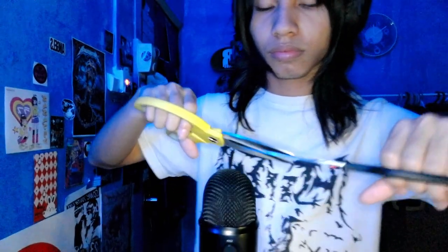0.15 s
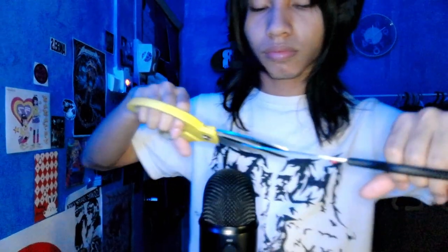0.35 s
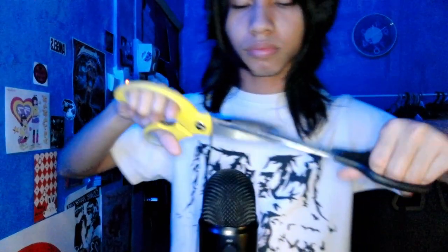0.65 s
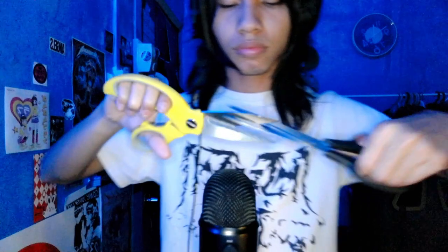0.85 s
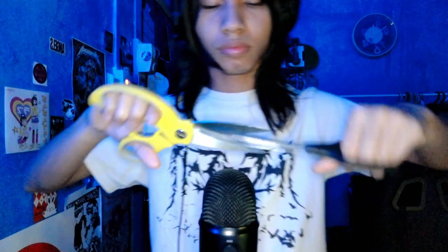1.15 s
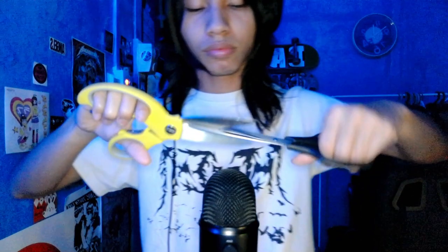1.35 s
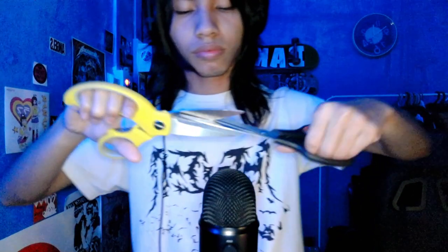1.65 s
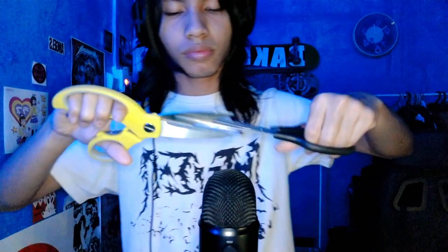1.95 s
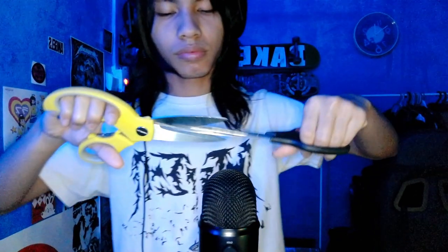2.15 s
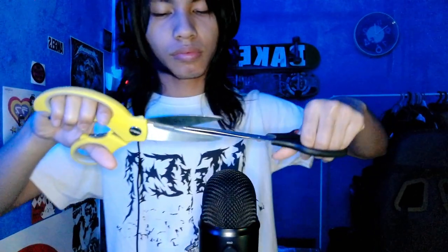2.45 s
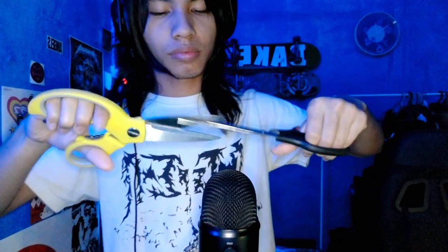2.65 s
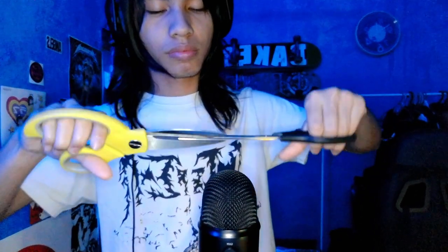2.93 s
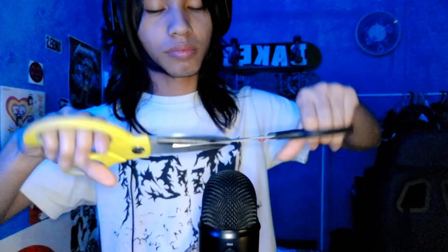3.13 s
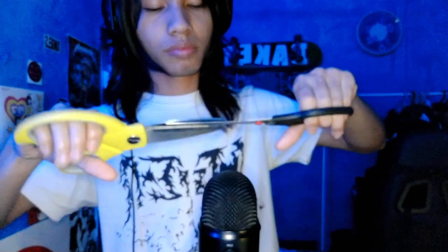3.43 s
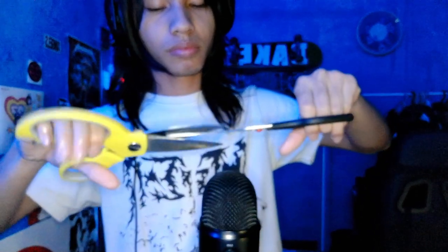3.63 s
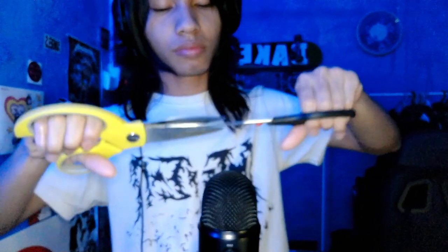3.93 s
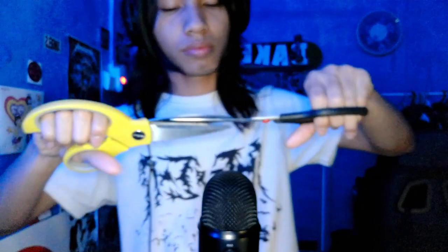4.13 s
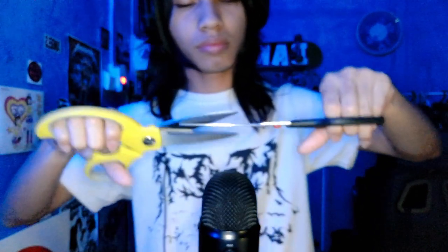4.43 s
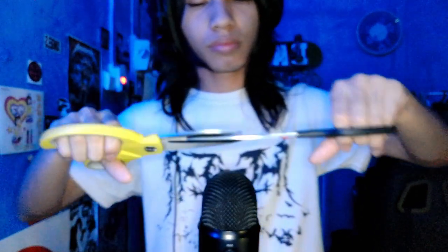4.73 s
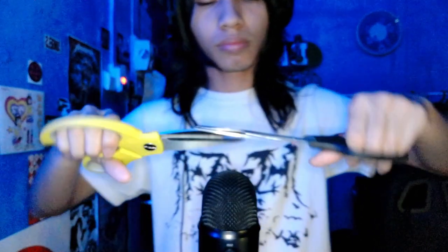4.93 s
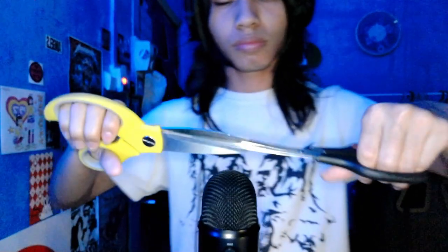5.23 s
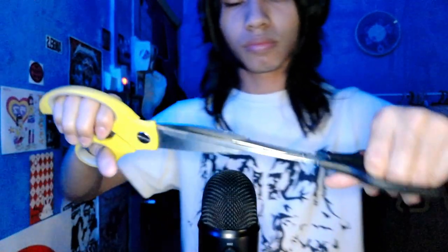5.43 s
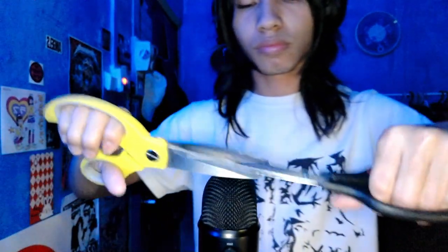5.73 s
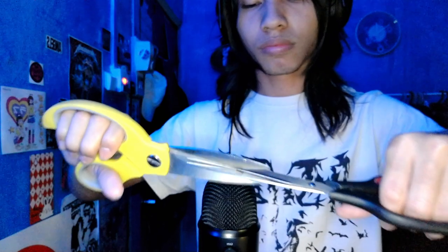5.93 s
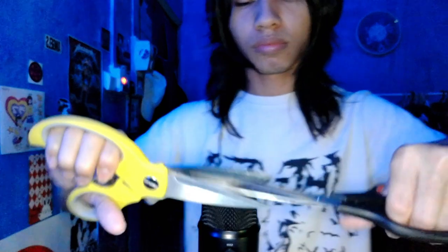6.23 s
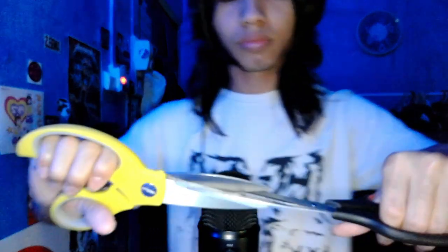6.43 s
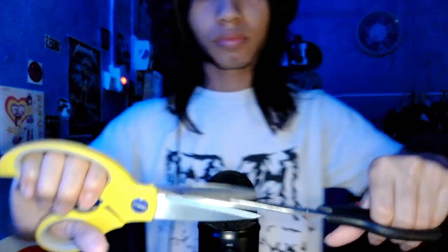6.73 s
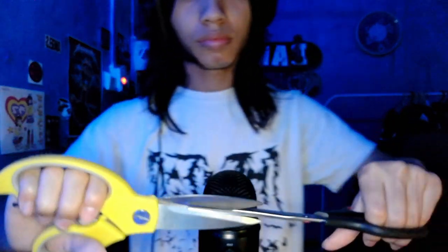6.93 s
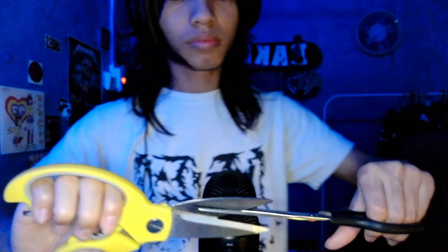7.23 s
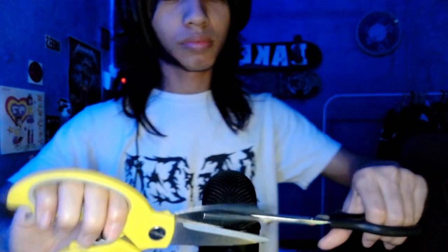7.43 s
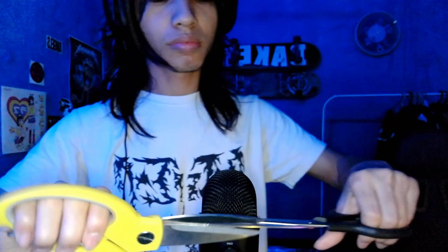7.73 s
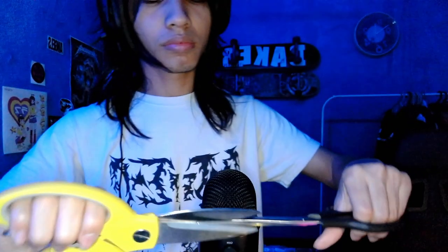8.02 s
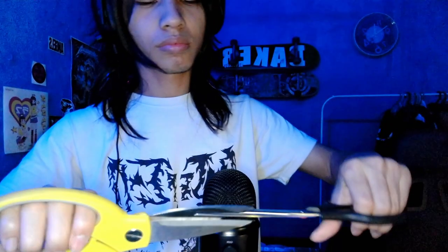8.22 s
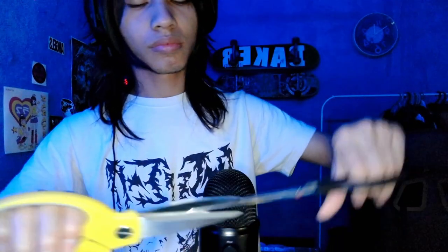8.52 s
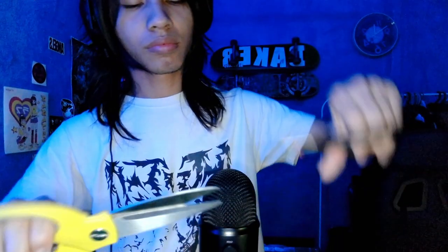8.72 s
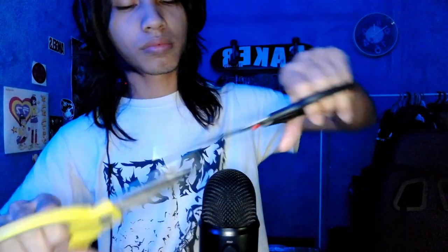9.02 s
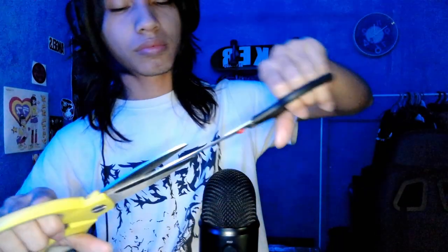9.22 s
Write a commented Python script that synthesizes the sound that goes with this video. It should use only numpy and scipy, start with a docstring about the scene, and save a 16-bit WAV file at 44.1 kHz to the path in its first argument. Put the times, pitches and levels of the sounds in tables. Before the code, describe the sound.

Steel scissor blades slide and clash irregularly up close, ringing sharply around two seconds, then lighter scrapes and hard snips near the end.

```python
"""Two large pairs of scissors are worked against each other close to a stereo microphone in a small room.
From the start steel edges slide with a gritty stick-slip rasp and tick as they meet; the loudest come near 2 s.
Each stroke or blow rings the blades, knocks in the plastic handles and jolts the hands. From 4.2 to 6.9 s the
hands move round to the front; hard snips return near 9 s. Short echo and low rumble throughout."""
import sys
import numpy as np
from scipy import signal
from scipy.fft import rfft, irfft
from scipy.io import wavfile

SR = 44100
rng = np.random.default_rng(int(sys.argv[2]) if len(sys.argv) > 2 else 0)


def log_audio(samples):
    """Write samples as a 16-bit WAV file to the path given in sys.argv[1]."""
    # one column per channel
    frames = np.atleast_2d(samples).T
    # limit to full scale, then quantise
    limited = np.clip(frames, -1, 1)
    pcm = np.round(limited * 32767).astype(np.int16)
    wavfile.write(sys.argv[1], SR, pcm)


N = 413216
SIZE = 12288  # samples per event
T = np.arange(SIZE) / SR
HZ = np.arange(SIZE // 2 + 1) * SR / SIZE

# slides of steel on steel: (start [s], swell [s], hold [s], fade [s], blade level [dB],
# tilt [dB/octave above 1200 Hz], handle level [dB])
STROKES = [(0.028, 0.019, .008, 0.042, -34.5, 2.5, -52), (0.069, 0.029, .045, .045, -36.5, 3, -56),
           (.275, 0.023, .008, .025, -51.5, 0, -58), (.333, 0.0093, .06, 0.09, -51.5, 0, -58),
           (0.493, 0.033, .11, 0.035, -47, -0.6, -59), (.70, 0.048, .11, 0.026, -47, -3.5, -59),
           (0.859, 0.016, .04, 0.023, -39, -2.5, -45.5), (0.995, 0.02, 0.0052, .008, -39.5, -1, -51),
           (1.028, 0.0042, .022, 0.044, -33.5, -2.1, -31.5), (1.238, 0.027, 0.0088, .006, -38.5, -1.5, -46),
           (1.282, 0.0082, 0.085, .015, -43, -1, -38.5), (1.608, 0.027, 0.0081, 0.027, -38, -0.5, -41.5),
           (1.66, 0.0036, 0.017, 0.11, -53, -1, -52), (1.757, 0.0053, .07, 0.016, -28, 1, -36),
           (1.949, 0.02, .04, 0.028, -33, 1, -47.5), (2.087, 0.026, 0.03, 0.066, -22, 2, -34),
           (2.249, 0.026, .05, 0.034, -36, 1.5, -56), (2.426, .024, 0.033, 0.08, -19, 3.5, -36.5),
           (2.84, 0.016, .01, 0.076, -44, -2, -42.5), (2.93, 0.029, .03, .06, -43, -2.5, -43),
           (3.17, .012, 0.0055, 0.018, -36.5, -0.5, -42.5), (3.215, 0.0083, 0.052, 0.057, -46.5, -1, -55.5),
           (3.382, 0.019, .015, .012, -40, -1.2, -56), (3.431, 0.011, .07, .01, -50.5, -1.5, -52.5),
           (3.571, 0.0068, .06, 0.037, -51.5, 1.5, -58), (3.768, 0.0063, .003, 0.013, -33.5, 1.5, -44.5),
           (3.952, 0.033, .01, 0.046, -42, -1.5, -49.5), (4.093, .015, 0.057, 0.065, -43, -2, -56),
           (4.26, 0.027, .015, 0.023, -57.5, -2.5, -52.5), (4.325, .015, 0.076, .02, -49, 2, -57),
           (4.407, 0.037, .015, 0.036, -38, -1.6, -49.5), (4.495, 0.033, .03, 0.02, -49.5, -3, -54.5),
           (4.588, 0.027, .03, 0.15, -47, -2, -52.5), (4.70, 0.062, 0.044, .05, -37, 0, -53.5),
           (4.88, .012, .008, 0.018, -28.5, 0.5, -38), (5.05, 0.0081, .015, 0.03, -52, -3.5, -46),
           (5.149, 0.014, 0.0093, 0.031, -34.5, -2.5, -38), (5.428, .015, 0.061, 0.032, -44.5, -1.5, -54),
           (5.52, 0.011, 0.068, .01, -52.5, -1.5, -59.5), (5.595, .02, .012, 0.045, -36.5, 0.5, -36.5),
           (5.71, 0.012, 0.027, 0.027, -49, 0, -49), (5.774, 0.023, 0.0052, 0.01, -49, -0.5, -42),
           (5.848, 0.014, .005, 0.078, -44.5, -3, -42.5), (5.944, 0.021, .04, 0.048, -40.5, -1, -50),
           (6.201, .012, .012, 0.034, -38, -0.5, -39.5), (6.351, 0.0075, .06, 0.034, -46.5, 1, -43.5),
           (6.44, 0.039, .04, 0.056, -39, -1.5, -47.5), (6.615, 0.0055, .005, 0.077, -55, -5.5, -50),
           (7.054, .015, .012, 0.056, -45.5, -2.5, -48), (7.293, .07, .02, 0.026, -42, -0.5, -47),
           (7.408, .018, .01, 0.038, -36.5, -3.5, -41.5), (7.466, 0.016, .15, 0.083, -50.5, -3, -49.5),
           (7.728, 0.011, .05, 0.11, -43, -2, -52), (7.979, 0.054, .04, 0.11, -51, -1.5, -54.5),
           (8.36, 0.053, .055, 0.043, -43, -0.9, -49.5), (9.151, 0.02, .012, 0.084, -37.5, 1, -52.5),
           (9.341, 0.013, .012, .02, -33, 4.5, -56)]
# broad response of the plastic handles: (frequency [Hz], level [dB])
HANDLE_RESPONSE = [(25, -13.5), (65, 11.5), (110, 4.5), (180, 1), (300, -1), (480, -5), (700, -7.5),
                   (1200, -14), (2500, -27), (8000, -57)]


def undb(db):
    """Decibels to gain."""
    return 10 ** (np.asarray(db) / 20)


def unit(x):
    """Scale to a mean energy of one per channel."""
    return x / np.sqrt(np.sum(x ** 2) / len(np.atleast_2d(x)) + 1e-18)


def contour(points, hz):
    """Decibels of a spectrum, joined on a log-frequency axis."""
    f, db = np.transpose(points)
    return np.interp(np.log(hz + 1), np.log(f), db)


def causal(db):
    """Minimum-phase response with the given gains: it rings only after the blow."""
    cepstrum = irfft(np.log(undb(db)))
    cepstrum[1:SIZE // 2] *= 2
    cepstrum[SIZE // 2 + 1:] = 0
    return np.exp(rfft(cepstrum))


def add(out, start_s, sound, pan_db):
    """Mix a sound in at its time, panned at constant energy."""
    i = max(int(start_s * SR), 0)
    gains = np.sqrt(2) * unit(undb(np.array([pan_db, -pan_db]) / 2))
    out[:, i:i + SIZE] += (gains[:, None] * sound)[:, :N - i]


def room_tone(level_db=-56, side_db=-3, unrelated_hz=900):
    """A steady low rumble, like a distant fan, under faint hiss that is unrelated left and right."""
    # spectrum of the rumble and hiss: (frequency [Hz], level [dB])
    tone_spectrum = [(25, 1.5), (50, -3), (110, -3), (200, -13), (420, -6.5), (550, -19), (750, -19),
                     (980, -20), (1500, -25), (3000, -33.5), (7000, -40), (15000, -39.5)]
    hz = np.arange(N // 2 + 1) * SR / N
    mid, side = rfft(rng.standard_normal((2, N))) * undb(contour(tone_spectrum, hz))
    # left and right share more of the lows
    side = irfft(side * undb(side_db / (1 + hz / unrelated_hz)), N)
    mid = irfft(mid, N)
    return undb(level_db) * (mid + np.array([side, -side])) / mid.std()


def room(dry, early_db=-19, late_db=-21, t60_s=0.41, dull_hz=7000):
    """Chest and desk reflect at once; the walls follow, longer and duller."""
    early = unit(rng.standard_normal((2, SIZE)) * np.exp(-T / .018) * (T > .003))
    late = unit(rng.standard_normal((2, SIZE)) * np.exp(-np.log(1000) * T / t60_s) * (T > .008))
    late = signal.sosfilt(signal.butter(1, dull_hz, fs=SR, output="sos"), late)
    echo = undb(early_db) * early + undb(late_db) * late
    return signal.fftconvolve(dry, echo, axes=1)[:, :N]


def place(time_s):
    """Pan, free-length resonance and its lift where the blades cross at this moment."""
    # crossing point: (time [s], left minus right [dB], resonance of the free blade length [Hz], its lift [dB])
    crossings = [(0, -1, 2160, 5), (.8, 1, 1830, 3), (1.05, 2, 1250, 3), (2.5, 3.5, 1250, 5),
                 (2.9, 2.5, 1400, 2.5), (4.3, 3.5, 1510, 1), (4.8, 2.5, 4270, -1.5), (6.3, 1, 4150, 2),
                 (8.1, -1.5, 4300, 2), (9.37, 4.5, 5120, 4)]
    times, *columns = np.transpose(crossings)
    return [np.interp(time_s, times, column) for column in columns]


def at_capsules(spectrum, start_s, scatter_db, scatter_s):
    """Blades radiate from both faces, so the capsules are out of phase, differently as the hands move to the front."""
    # phase by which the left capsule leads: (frequency [Hz], blades above the microphone [rad],
    # blades in front of it [rad])
    capsule_lead = [(60.5, 0.52, 1.4), (200, 1.6, 1.45), (1000, 1.2, 1.54), (3000, 0.49, 2.18),
                    (4260, 1.7, 2.3), (7000, 1.1, 2.3), (9900, 2.37, 2.2), (12000, 1.72, 1.6),
                    (15050, 2.3, 0.81)]
    hz, above, front = np.transpose(capsule_lead)
    forward = np.interp(start_s, [4.2, 6.9], [0, 1])
    lead = np.interp(HZ, hz, above + forward * (front - above))
    direct = np.exp(1j * np.array([[.5], [-.5]]) * lead)
    # short bending waves run up and down the steel and reach each capsule differently
    scatter = rfft(unit(rng.standard_normal((2, SIZE)) * np.exp(-T / scatter_s)))
    scatter *= np.sqrt((HZ + 200) / (HZ + 3000))
    return unit(irfft(spectrum * (direct + undb(scatter_db) * scatter)))


def blades(colour, tilt_db, ring_db, free_hz=3000, free_db=0):
    """The steel's frequency response: broad colour, one region lifted by the free length, and ringing modes."""
    # ringing modes: (frequency [Hz], width [Hz], level over the broad response before ring_db [dB])
    blade_modes = [(1190, 70, -1), (2980, 150, -1), (4700, 45, 1), (6040, 80, -5), (6640, 65, 9),
                   (8290, 120, -4), (11090, 90, 2), (13100, 110, 0), (14510, 40, 1), (15730, 40, -4)]
    free = free_db * np.exp(-(np.log2((HZ + 1) / free_hz) / 0.49) ** 2)
    tilt = tilt_db * np.log2(np.maximum(HZ, 1200) / 1200)
    broad = causal(contour(colour, HZ) + tilt + free)
    modes = sum(undb(ring_db + db) / (1 + 2j * (HZ - hz) / width) for hz, width, db in blade_modes)
    return broad * (1 + modes)


def stray_ticks(level_db=-2, spread_db=4.5, thump_db=-7.5, chatter_ms=.9):
    """Somewhere in each slide's hold the edges skip and tick; rows as in snips."""
    ticks = []
    for start, swell_s, hold_s, _, blade_db, tilt_db, handle_db in STROKES:
        when, size = rng.random(2)
        time = start + swell_s + when * hold_s
        tick_db = blade_db + level_db + spread_db * (2 * size - 1)
        ticks.append((time, tick_db, chatter_ms, tilt_db, place(time)[0], handle_db + thump_db))
    return ticks


def snipping(thump_hz=66, thump_s=.008, knock_db=-3, knock_s=0.0048, skid_db=-28, skid_s=0.037):
    """Edges run up, collide in a brief chatter and skid on; the blow knocks the handles and jolts the hands."""
    # blades meeting or snapping shut: (time [s], level over 5 ms [dB], chatter decay [ms],
    # tilt [dB/octave above 1200 Hz], left minus right [dB], thump level over 20 ms [dB])
    snips = [(0.0243, -33, 1.4, 17, -17, -54), (.056, -34, 2.5, 6, -9, -63),
             (0.1935, -46.5, 1.1, -9, 1, -69), (0.354, -32, 2.2, 4.5, -5, -68),
             (0.4382, -45, 0.6, -0.5, 1, -51), (0.9389, -26.5, 0.78, 5.5, 3.5, -39.5),
             (0.9863, -30.5, 0.64, -1.5, -2, -39), (1.0356, -23, 2.2, 2.5, -5, -29.5),
             (1.045, -23, 0.87, 11, 23, -59), (1.277, -28.5, 0.45, 3.5, 0, -37), (1.285, -29, 1, 5, 1, -38),
             (1.376, -32.5, 1.2, 3, 2, -40), (1.3878, -44.5, 1, -6.5, 0, -43.5),
             (1.4375, -52.5, 1.3, -6.4, 3, -73), (1.6425, -18, .5, 4, 2.5, -34),
             (1.998, -10.5, 3.2, 12.5, -1.5, -38.5), (2.0613, -32, 1.4, 0.5, 0, -41),
             (2.3357, -23.5, 1.5, 6.5, 0, -41.5), (2.4502, -10, 2.6, 13, -1, -72),
             (2.5598, -37.5, 1.6, 2.5, 3, -44.5), (2.6053, -32.5, 0.35, -.8, 6, -52),
             (2.754, -45, 1.4, -2.5, 7, -48), (2.7786, -34, 1.1, 1, 2.5, -45),
             (3.0461, -29.5, 1.1, -.5, 0, -50.5), (3.0748, -38.5, 1.1, 1, 6, -49),
             (3.155, -30, 0.62, .5, 3, -61), (3.1859, -19, 1.9, 1, 2, -59), (3.2457, -36, 2, 2.5, 3.5, -63),
             (3.399, -29, 0.76, 5.5, 16, -56), (3.409, -31, 0.51, 7, 5, -64),
             (3.605, -35.5, 0.66, 1, 2.5, -44.5), (3.6746, -43, 1, -5, 2, -50),
             (3.8081, -43.5, .9, 3, -1, -54), (4.1217, -32, 1.1, 6.5, 11, -65),
             (4.1639, -33, 0.9, 5, 2, -48.5), (4.4689, -29, 0.8, 4, 1, -46.5), (5.1439, -38, 1, -3, 2, -43),
             (5.625, -24.5, .7, 2, 8, -48), (5.868, -41.5, 1.3, 2, 0, -37.5),
             (6.2196, -34.5, 2.3, 0, 0, -36.5), (6.4551, -29.5, 1.9, 3, 2, -37.5),
             (6.5049, -29, 1.1, 3, -1, -58), (6.9557, -34.5, 0.96, -2, 1.5, -62),
             (7.0157, -44.5, 0.74, -2.5, -1, -51), (7.1268, -30.5, 0.54, -1.5, 2.5, -46),
             (7.1541, -40, 2.3, -2, 1, -61), (7.373, -33, 2.4, -5, 1, -40),
             (7.7761, -30.5, 1.5, -1.5, 3, -62), (7.8478, -33.5, .9, 2, .5, -47),
             (8.0662, -41, 1.5, -2, -1, -58), (8.1874, -44, 3.4, -4, 1.5, -48),
             (8.9385, -22, 0.91, -1.5, 2.5, -44.5), (9.0057, -23, 0.97, 4.5, 2, -35),
             (9.081, -31.5, 1.2, 2.2, -1, -47.5), (9.1787, -20.5, 1.6, 11.5, 17, -43),
             (9.188, -24, 0.86, 9.5, -11, -47), (9.2243, -33, 1.6, 0, -2, -59)]
    # broad response of the colliding blades: (frequency [Hz], level [dB])
    snip_colour = [(150, -11), (600, -6), (1200, -5), (2200, -3), (3200, 0.5), (4200, -4), (5800, 3.5),
                   (7500, 1), (10000, -1), (15000, -6)]
    out, handle = np.zeros((2, N)), causal(contour(HANDLE_RESPONSE, HZ))
    since = T - .01  # seconds from the collision
    before, after = np.maximum(-since, 0), np.maximum(since, 0)
    for time, tick_db, chatter_ms, tilt_db, pan_db, jolt_db in list(snips) + stray_ticks():
        # the run-up rises in 0.88 of the decay time
        collision = np.exp(-1000 * (before / 0.88 + after) / max(chatter_ms, .2))
        skid = undb(skid_db) * (since > 0) * np.exp(-after / skid_s)
        force = rng.standard_normal(SIZE) * (collision + skid)
        steel = blades(snip_colour, tilt_db, ring_db=-27)
        tick = at_capsules(rfft(force) * steel, time, scatter_db=-0.5, scatter_s=0.0026)

        jolt_hz = thump_hz * np.exp(0.12 * rng.standard_normal())
        jolt = unit(np.sin(2 * np.pi * jolt_hz * after) * np.exp(-after / thump_s))
        blow = rng.standard_normal(SIZE) * (since > 0) * np.exp(-after / knock_s)
        knock = unit(irfft(handle * rfft(blow)))
        body = at_capsules(rfft(jolt + undb(knock_db) * knock), time, scatter_db=-2, scatter_s=0.0044)

        # unit energy to level over 5 ms and 20 ms
        sound = undb(tick_db) * np.sqrt(.005 * SR) * tick
        sound += undb(jolt_db) * np.sqrt(.02 * SR) * body
        add(out, time + since[0], sound, pan_db)
    return out


def slips(rate_hz=160, slip_s=0.0015, uneven_db=3):
    """Stick-slip: the edge catches and lets go in a nearly regular sawtooth of speed."""
    chance = rng.standard_normal((120, 2))
    times = np.r_[0, np.cumsum(np.exp(.16 * chance[1:, 0]) / rate_hz)]
    last = np.searchsorted(times, T, side="right") - 1
    speed = np.exp(-(T - times[last]) / slip_s) * undb(uneven_db * chance[last, 1])
    return speed / np.sqrt(np.mean(speed ** 2))


def nicks(per_s=110, nick_db=5, nick_s=0.00059):
    """Now and then the edge catches on a nick: a short surge of friction."""
    surge = undb(nick_db * np.minimum(rng.exponential(size=SIZE), 3))
    catches = (rng.random(SIZE) < per_s / SR) * surge
    return 1 + signal.lfilter([1], [1, -np.exp(-1 / (nick_s * SR))], catches)


def along_edge(force, progress, response, start_s, count=4):
    """The contact travels along the edge, and each stretch of steel scatters its waves in its own way."""
    out = 0
    for stretch in range(count):
        share = np.sqrt(np.maximum(1 - abs(progress * (count - 1) - stretch), 0))
        local = force * share
        sound = at_capsules(rfft(local) * response, start_s, scatter_db=4, scatter_s=0.0027)
        out = out + np.linalg.norm(local) * sound
    return unit(out)


def sliding(grain_db=3, bite_s=0.0032, release_s=0.0097, ring_per_db=0.5, rub=0.65, hand_db=-11):
    """Each stroke drags the edge over tiny burrs; harder strokes ring more, and the slips drum in the handles."""
    # broad response of the sliding blades: (frequency [Hz], level [dB])
    slide_colour = [(150, -17.5), (600, -5.5), (1100, -3), (1700, 0), (2300, -2), (2900, 1.5), (4100, -1),
                    (5400, 0), (7000, 1), (9500, -0.5), (12000, -4), (15000, -2.5)]
    out, handle = np.zeros((2, N)), causal(contour(HANDLE_RESPONSE, HZ))
    hand = causal(contour([(20, -10.5), (65, -2.5), (110, -1), (200, -20.5), (800, -46.5)], HZ))
    since = T - .02  # seconds from the start of the stroke
    for start, swell_s, hold_s, fade_s, blade_db, tilt_db, handle_db in STROKES:
        length_s = swell_s + hold_s + fade_s
        pan_db, free_hz, free_db = place(start)
        # stick-slip depth 0-1, deeper as the handles outweigh the blades
        judder = np.clip(0.5 + 0.03 * (handle_db - blade_db), 0, 1)

        # slides harder than -40 dB rise and fall further
        deeper_db = .35 * (blade_db + 40)
        corners_s = [0, swell_s, swell_s + hold_s, length_s]
        pressure = undb(np.interp(since, corners_s, [-13 - deeper_db, 0, 0, -15.5 - deeper_db]))
        # the edges touch lightly just before they bite and just after they let go
        pressure *= np.exp(-np.maximum(-since, 0) / bite_s - np.maximum(since - length_s, 0) / release_s)
        grip = pressure ** 0.85  # the handles drum on as a slide dies away

        speed = slips()
        burrs = rng.standard_normal(SIZE) * undb(grain_db * np.minimum(rng.exponential(size=SIZE), 6))
        # a light touch catches on single nicks; a hard, fast stroke runs them together
        catching = nicks() ** np.interp(blade_db, [-45, -22], [1.25, .8])
        force = pressure * burrs * catching * (1 - judder + judder * speed)
        ring_db = np.clip(ring_per_db * (blade_db + 25), -14, 1)
        response = blades(slide_colour, tilt_db, ring_db, free_hz, free_db)
        steel = along_edge(force, np.clip(since / length_s, 0, 1), response, start)

        rubbing = rub * (1 - judder / 2) * rng.standard_normal(SIZE)
        push = grip * (judder * (speed - speed.mean()) + rubbing)
        # a handle radiates the sudden changes of the push: high-pass near 250 Hz
        push = signal.lfilter([1, -1], [1, -np.exp(-2 * np.pi * 250 / SR)], push)
        plastic = at_capsules(rfft(push) * handle, start, scatter_db=6, scatter_s=0.0037)
        tremor = rfft(grip * rng.standard_normal(SIZE))
        rumble = at_capsules(tremor * hand, start, scatter_db=0.5, scatter_s=.004)

        sound = undb(blade_db) * steel + undb(handle_db) * (plastic + undb(hand_db) * rumble)
        add(out, start + since[0], np.linalg.norm(pressure) * sound, pan_db)
    return out


def scene():
    """Slides and snips in the room."""
    scissors = sliding() + snipping()
    return scissors + room(scissors) + room_tone()


def record(dry, top_hz=15800):
    """The recorder cuts the highest treble."""
    return signal.sosfilt(signal.ellip(10, .2, 70, top_hz, fs=SR, output="sos"), dry)


dry = scene()
out = record(dry)
log_audio(out)
```